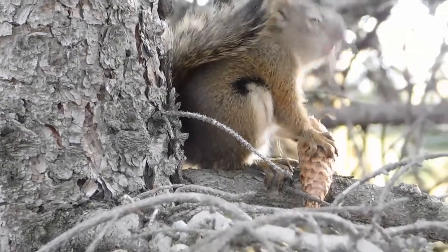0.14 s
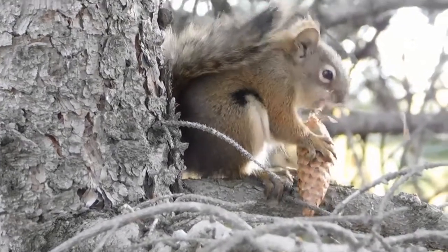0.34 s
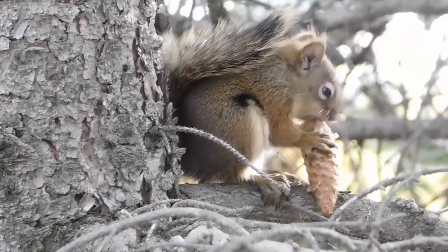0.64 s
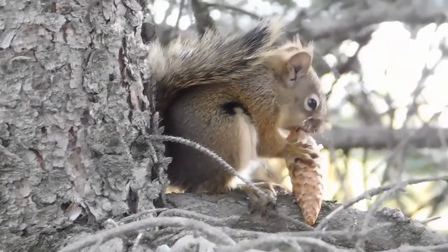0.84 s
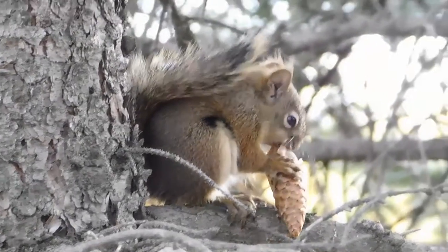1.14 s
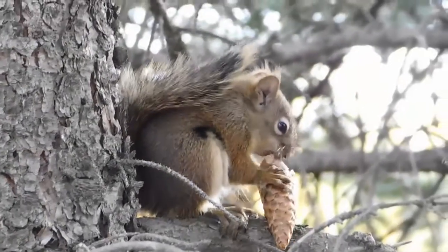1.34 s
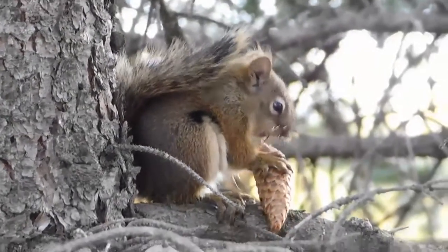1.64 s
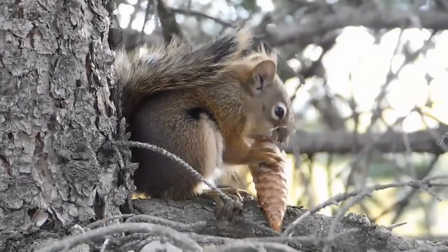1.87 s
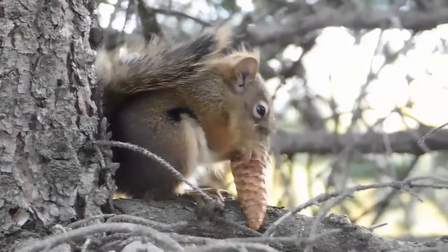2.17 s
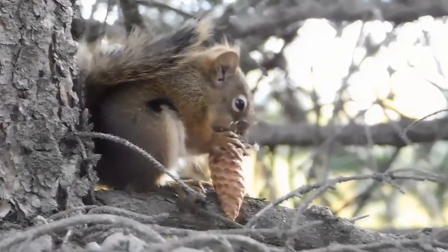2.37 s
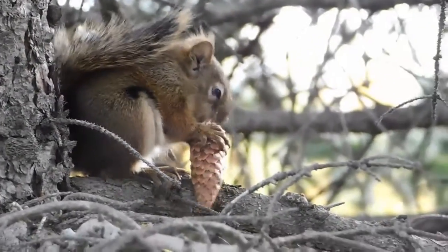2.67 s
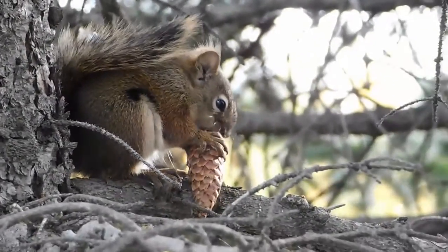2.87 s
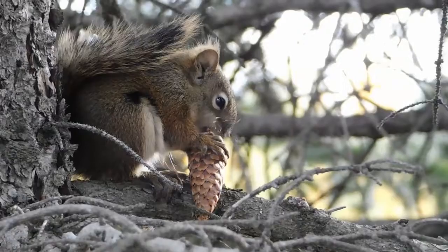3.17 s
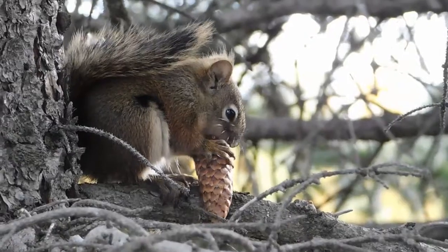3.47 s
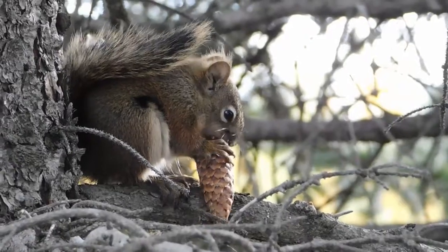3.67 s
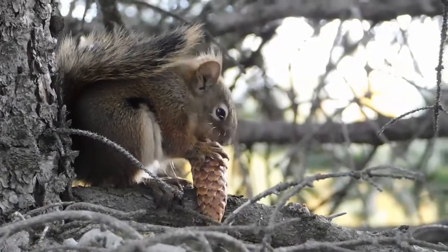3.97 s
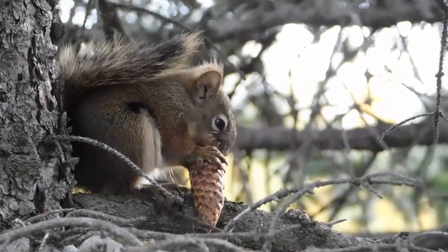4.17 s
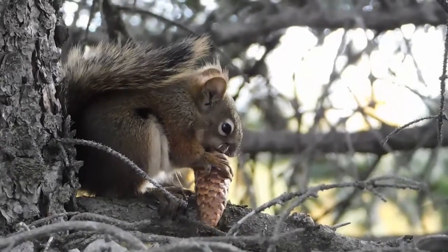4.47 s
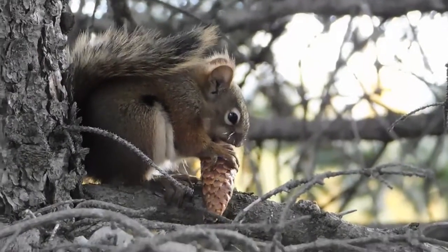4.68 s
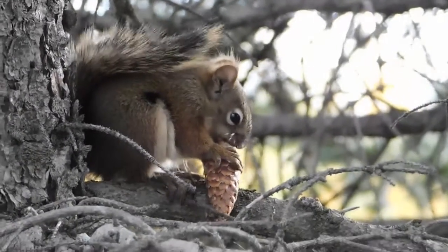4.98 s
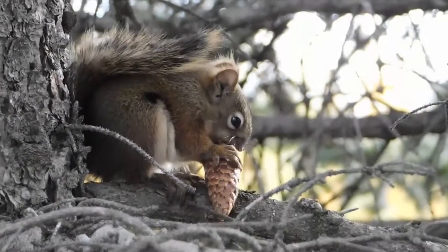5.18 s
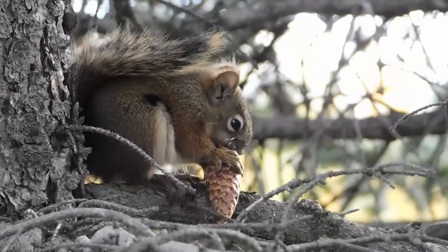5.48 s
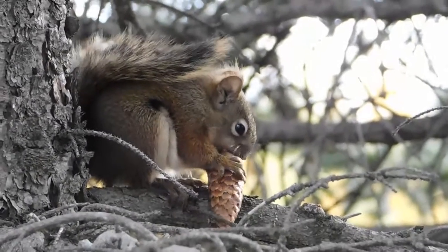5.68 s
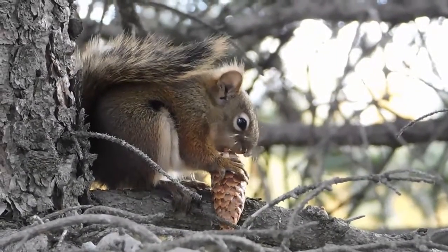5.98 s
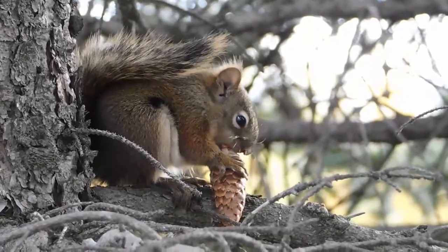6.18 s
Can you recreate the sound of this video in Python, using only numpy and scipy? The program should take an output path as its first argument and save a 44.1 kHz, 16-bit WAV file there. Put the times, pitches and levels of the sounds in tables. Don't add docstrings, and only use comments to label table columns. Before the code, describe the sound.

Steady muffled traffic roar and faint hiss fill an open woodland. Near the stereo microphone, a little to the right, a squirrel gives six very short whistled squeaks, some high and some low, between fine tooth ticks and papery cone crackles. Biting is sparse at first, bursts sharply near the middle, then continues as isolated snaps and dry tearing, with only a faint smear of reflections from branches.

```python
import sys
import numpy as np
from scipy import signal
from scipy.fft import rfft, irfft
from scipy.io import wavfile
from scipy.ndimage import uniform_filter1d

SR = 44100
rng = np.random.default_rng(int(sys.argv[2]) if len(sys.argv) > 2 else 0)


def digitize_waveform(pressure):
    field = np.atleast_2d(pressure).T
    bounded = np.clip(field, -1, 1)
    quanta = np.round(bounded * 32767).astype(np.int16)
    wavfile.write(sys.argv[1], SR, quanta)


def nominal_scale(level):
    x = np.asarray(level, float) / 20
    return 10 ** x


N = 278712
T = np.arange(N) / SR
HZ = np.maximum(np.arange(N // 2 + 1) * SR / N, 1)

# start in seconds, end in seconds, top in Hz,
# drift of the top in Hz per ms, effort in dB.
SQUEAKS = [
    (.0370, .0625, 2500, 0, -41),
    (1.7095, 1.7815, 5400, 10, -44.5),
    (2.7060, 2.7765, 5420, 7, -46),
    (3.1420, 3.2005, 5060, 0, -44),
    (3.5887, 3.635, 2950, -8, -50.5),
    (4.5805, 4.6170, 2930, 14, -46.5),
]
# frequency in Hz, gain in dB.
THROAT = [(1500, -5), (2200, 0), (2600, -1), (3000, -6), (3600, -11), (4200, -20), (4900, -9), (5200, -5),
          (5500, -5.5)]
# frequency in Hz, level in dB.
OCTAVE = [(3500, -32), (4400, -24), (5000, -20), (5300, -11), (5800, -7), (6200, -5), (6600, -16),
          (7300, -19), (8300, -34), (11000, -44)]
# time in seconds, peak in dB, brightness (0 low mode to 2 high mode).
BITES = [(.1211, -54, 1.0), (1.1622, -54, .7), (1.835, -61, 1.2), (1.8762, -56, 1.2), (1.8815, -55, 1.6),
         (1.9473, -54, .7), (1.9692, -54, .8), (2.7052, -56, .1), (3.0353, -55, .5), (3.1764, -47, 1.0),
         (3.1855, -49, .8), (3.2059, -45, 1.0), (3.2255, -35, .45), (3.2451, -42, .3), (3.5855, -60, 1.7),
         (3.8143, -59, 1.9), (3.847, -56, .5), (3.9236, -59, 1.4), (4.277, -54, 0.0), (4.3897, -57, .1),
         (4.5591, -59, .4), (4.579, -55, 2.5), (4.5895, -58, .9), (5.5851, -53, .9), (5.8483, -55, .7),
         (5.8831, -57, 1.0), (6.0166, -57, 1.4), (6.0594, -56, 1.0), (6.1557, -54, .3)]
# time in seconds, peak in dB, brightness (as for bites).
CHIPS = [(.565, -59, .1), (2.9776, -55, 1.0), (3.2313, -45, .5), (4.5145, -52, -.7), (4.5704, -60, 2.3),
         (4.6256, -56, .1), (4.8756, -50.5, .3), (4.9978, -50, -.6), (5.0995, -49, .65), (5.224, -52, .4),
         (5.312, -53, .7), (5.7171, -49, -.5)]
# centre in Hz, width in octaves.
BITE_MODES = [(5700, .55), (9200, .55), (12800, .42)]
# start in seconds, end in seconds,
# level in dB, centre in Hz.
TEARS = [(0.11, .14, -77, 8500), (1.715, 1.74, -74, 7000), (1.76, 1.79, -78, 5500),
         (1.82, 1.87, -70, 11980), (1.87, 1.902, -68, 12000), (1.872, 1.88, -52.5, 2520),
         (3.17, 3.266, -56.5, 5200), (1.94, 1.96, -67, 10500), (1.964, 1.99, -67, 9000),
         (2.70, 2.745, -73, 6500), (2.70, 2.79, -70, 12500), (2.765, 2.79, -70, 5500),
         (3.172, 3.19, -59, 10000), (3.183, 3.203, -58, 6500), (3.205, 3.222, -58, 9000),
         (3.223, 3.237, -62, 8500), (3.246, 3.26, -54.5, 6800), (3.248, 3.262, -58, 12000),
         (3.26, 3.3, -67, 9000), (3.603, 3.655, -68, 10400), (4.0, 4.08, -72, 11000),
         (4.239, 4.30, -74, 10920), (4.56, 4.63, -72, 11000), (6.003, 6.1, -71, 10000),
         (6.122, 6.223, -70, 11000)]
# frequency in Hz, gain in dB.
SHADOW = [(2500, -.5), (4000, -3), (5500, -4), (6200, -6), (8000, -1), (12000, 0)]
# frequency in Hz, density in dB per Hz.
ROAR = [(110, -22.5), (180, -21.5), (277, -18.5), (550, -10), (750, -2.5), (996, -1.5), (1750, -9.5),
        (2890, -24), (4500, -36), (5850, -44), (9900, -120)]
# frequency in Hz, density in dB per Hz.
RUMBLE = [(12, -43), (20, -8), (48, -1.5), (59, 3), (86, -3), (114, 2.5), (146, -4), (260, -19.5),
          (340, -53), (570, -120)]
# time in seconds, length in seconds,
# roar rise in dB, rumble rise in dB.
PASSES = [(1.16, .3, -0.25, 3.0), (3.05, 0.3, -0.35, 3), (3.84, 0.23, -0.25, 3.5), (4.257, 0.19, 0.95, 3),
          (5.14, 0.14, 0.5, 1)]
# time in seconds, pitch in Hz, level in dB.
ENGINE = [(0.0, 127, -74), (.07, 125.6, -58.5), (.63, 125, -61), (1.158, 120.7, -57), (1.38, 108.6, -67),
          (1.6, 96.4, -55.5), (1.9, 96, -53)]
# start in seconds, end in seconds, pitch in Hz, level in dB.
DRONES = [(2.63, 3.8, 63.5, -65), (5.7, 5.27, 58, -69), (5.7, 5.6, 62, -73), (5.68, 6.4, 123, -66.5),
          (4.54, 4.95, 110, -63), (2.1, 4, 92.5, -78), (.9, 1.44, 77.2, -66)]
# frequency in Hz, density in dB per Hz.
AIR = [(1470, -44), (2500, -5.5), (3130, -7), (3380, -5.5), (3830, -8.5), (6860, -11.5), (15200, -21),
       (16000, -17.5)]
# frequency in Hz, likeness from 0 to 1.
LIKENESS = [(25, 0.84), (60, 1), (110, 0.99), (170, 0.99), (700, 0.87), (1200, 0.89), (1700, 0.41),
            (2200, 0.34), (2800, 0.27), (4300, 0.52), (7000, 0), (10000, 0.14), (15000, 0.1)]
# frequency in Hz, lag in radians.
LAG = [(100, 0.026), (700, 0.17), (1200, 0.92), (1700, 0.44), (2200, 0.67), (2800, 2.55), (3300, 2.57),
       (6400, 2), (9000, 3.2), (12000, 4.9), (16000, 7.3)]
# frequency in Hz, left minus right in dB.
TILT = [(60, 0.5), (180, 0.0), (550, 0.5), (1650, -1), (4970, 2), (15000, -0.5)]
# frequency in Hz, rms level in dB.
WHINE = [(14780, -99), (14810, -97), (15426, -99), (15485, -99)]

FOOT_HZ, RISE_OCT_PER_S, FALL_OCT_PER_S = 1700, 65, 96
SHOULDER = 11
ATTACK_S, RELEASE_S = .008, .003
PUSH_DB = 2
BITE_LAG_US, CHIP_LAG_US, OFF_MODE_DB = 80, 15, 5
PORT_LAG_S = 7.6e-5
ROAR_DB, RUMBLE_DB, AIR_DB = -43.5, -64, -65.5


def at_hz(points, hz):
    table_hz, value = np.transpose(points)
    return np.interp(np.log(hz), np.log(table_hz), value)


def rms_one(x):
    return x / np.sqrt(np.mean(x ** 2) + 1e-20)


def band(x, hz, octaves):
    edges = np.clip([hz * 2 ** (-octaves / 2), hz * 2 ** (octaves / 2)], 20, .45 * SR)
    return signal.sosfilt(signal.butter(2, edges, "band", fs=SR, output="sos"), x)


def window(start, end, edge):
    return np.clip(np.minimum(T - start, end - T) / edge, 0, 1)


def from_right(x):
    lag = np.exp(-2j * np.pi * HZ * PORT_LAG_S)
    left = irfft(rfft(x) * nominal_scale(at_hz(SHADOW, HZ)) * lag, N)
    return np.array([left, x])


def squeaks():
    out = np.zeros(N)
    for start, end, top_hz, drift, db in SQUEAKS:
        on = (T >= start) & (T <= end)
        t = T[on]
        rise = FOOT_HZ * 2 ** (RISE_OCT_PER_S * (t - start))
        fall = FOOT_HZ * 2 ** (FALL_OCT_PER_S * (end - t))
        top = top_hz + 1000 * drift * (t - (start + end) / 2)
        pitch = (rise ** -SHOULDER + fall ** -SHOULDER + top ** -SHOULDER) ** (-1 / SHOULDER)
        wobble = uniform_filter1d(rng.standard_normal(len(t)), size=60)
        sway = uniform_filter1d(rng.standard_normal(len(t)), size=260)
        push = PUSH_DB * ((t - start) / (end - start) - .5)
        effort = db + 8.0 * wobble + 18 * sway + push
        phase = 2 * np.pi * np.cumsum(pitch) / SR
        whistle = nominal_scale(at_hz(THROAT, pitch)) * np.sin(phase)
        octave = nominal_scale(at_hz(OCTAVE, 2 * pitch) - 4.5) * np.sin(2 * phase)
        breath = window(start, end + 1, ATTACK_S) * window(start - 1, end, RELEASE_S)
        out[on] += np.sqrt(2) * nominal_scale(effort) * (whistle + octave) * breath[on]
    return out


def ticks(rows, lag_us):
    out = np.zeros((2, N + 512))
    short_hz = np.arange(257) * SR / 512
    lag = np.exp(-2j * np.pi * short_hz * lag_us / 1e6)
    for s, db, bright in rows:
        snap = .3 * rng.standard_normal((2, 512)) * nominal_scale(-60 * T[:512] / .007)
        snap[:, :12] *= .3
        snap[:, 12] = 1
        loss_db = OFF_MODE_DB * (np.arange(3) - bright) ** 2
        mode_db = db + 1.5 + loss_db.min() - loss_db
        bite = np.zeros((2, 512))
        for k, (hz, octaves) in enumerate(BITE_MODES):
            ring = band(snap, hz, octaves)
            bite += (-1) ** k * nominal_scale(mode_db[k]) * ring / np.max(np.abs(ring))
        bite[0] = irfft(rfft(bite[0]) * lag)
        at = round(s * SR)
        out[:, at:at + 512] += bite
    return out[:, :N]


def tears():
    sizes = nominal_scale(4.5 * np.minimum(rng.exponential(1, (2, N)), 4)) * rng.choice([-1, 1], (2, N))
    clumps = nominal_scale(4.0 * rms_one(uniform_filter1d(rng.standard_normal(N), size=110)))
    breaks = rng.random((2, N)) < 9000 / SR
    shared, own = sizes * clumps * breaks
    grains = from_right(shared) + np.array([own, np.roll(own, shift=N // 3)])
    out = np.zeros((2, N))
    for start, end, db, hz in TEARS:
        fading = np.clip((T - start) / (end - start), 0, 1)
        crackle = rms_one(band(band(grains, hz, 1.9), hz, 1.9))
        out += nominal_scale(db + 4.0 - 10 * fading) * window(start, end + .008, .003) * crackle
    return out


def echoes(x):
    t = T[:int(.05 * SR)]
    smear = rng.standard_normal((2, len(t))) * nominal_scale(-60 * t / .05) * (t > .001)
    return nominal_scale(-32) * signal.fftconvolve(x[None], smear, axes=1)[:, :N]


def far_noise(spectrum):
    right, other = rfft(rng.standard_normal((2, N))) * nominal_scale(at_hz(spectrum, HZ))
    alike = np.clip(at_hz(LIKENESS, HZ), 0, 1)
    lagged = right * np.exp(-1j * at_hz(LAG, HZ))
    left = alike * lagged + np.sqrt(1 - alike ** 2) * other
    return rms_one(irfft([left * nominal_scale(at_hz(TILT, HZ)), right], N))


def traffic():
    s, length, roar_db, rumble_db = np.transpose(PASSES)
    near = np.exp(-((T[:, None] - s) / length) ** 2)
    roar = nominal_scale(ROAR_DB + near @ roar_db) * far_noise(ROAR)
    rumble = nominal_scale(RUMBLE_DB + near @ rumble_db) * far_noise(RUMBLE)
    return roar + rumble


def engines():
    s, hz, db = np.transpose(ENGINE)
    phase = 2 * np.pi * np.cumsum(np.interp(T, s, hz)) / SR
    hum = np.sqrt(2) * nominal_scale(np.interp(T, s, db)) * window(-1, s[-1], 0.73) * np.sin(phase)
    for start, end, hz, db in DRONES:
        same, own = band(rng.standard_normal((2, N)), hz, 0.12)
        drone = rms_one(same + .2 * own * [[1], [-1]])
        hum = hum + nominal_scale(db) * window(start, end, .2) * drone
    return hum


def air():
    return nominal_scale(AIR_DB) * far_noise(AIR)


def scene():
    voice = squeaks()
    teeth = ticks(BITES, BITE_LAG_US) + ticks(CHIPS, CHIP_LAG_US)
    animal = from_right(voice) + teeth + tears()
    return animal + echoes(voice + teeth[1]) + traffic() + engines() + air()


def top_cut(x):
    return signal.sosfilt(signal.butter(12, 15800, fs=SR, output="sos"), x)


def record(dry):
    whine = sum(np.sqrt(2) * nominal_scale(db) * np.sin(2 * np.pi * hz * T) for hz, db in WHINE)
    dulled = signal.sosfilt(signal.cheby2(10, 50, 16600, fs=SR, output="sos"), dry)
    return top_cut(dulled + whine)


dry = scene()
out = record(dry)
digitize_waveform(out)
```